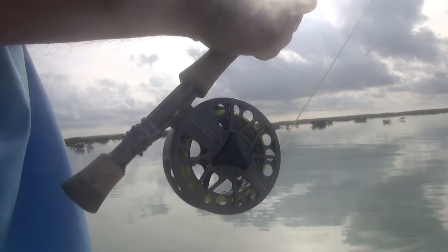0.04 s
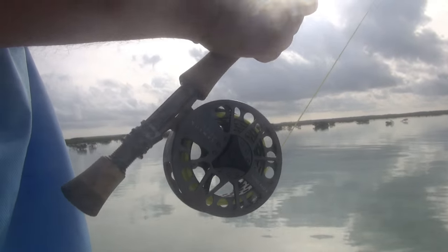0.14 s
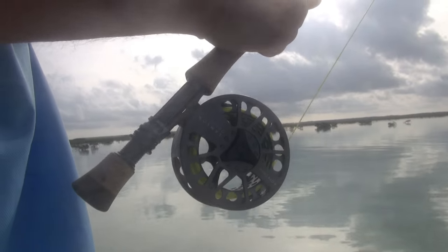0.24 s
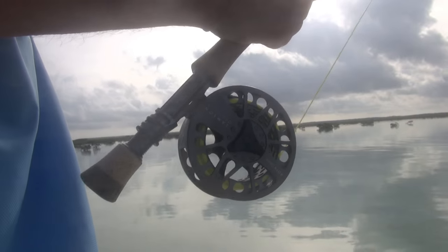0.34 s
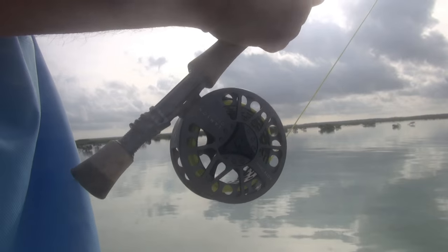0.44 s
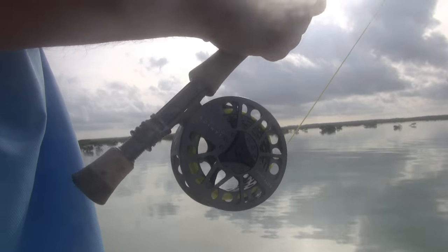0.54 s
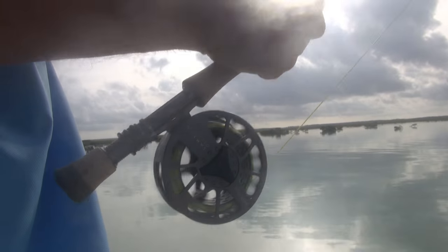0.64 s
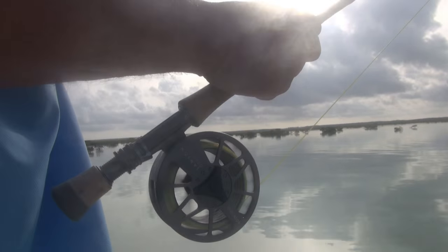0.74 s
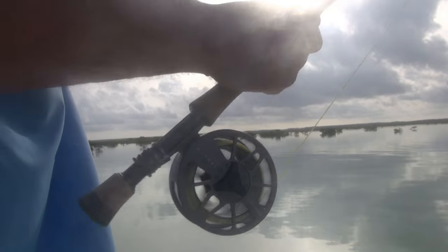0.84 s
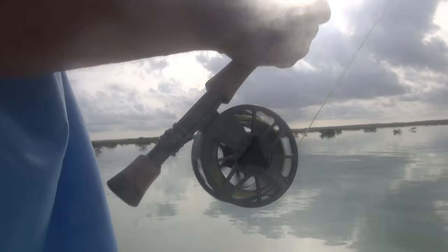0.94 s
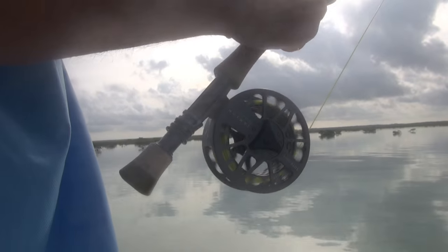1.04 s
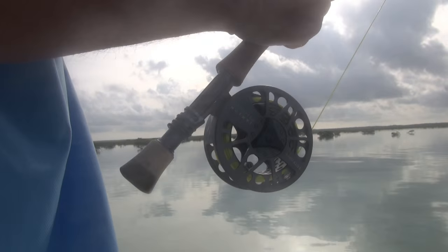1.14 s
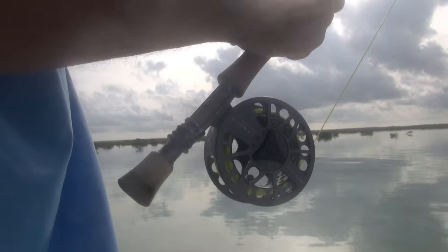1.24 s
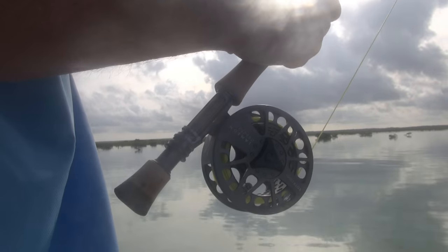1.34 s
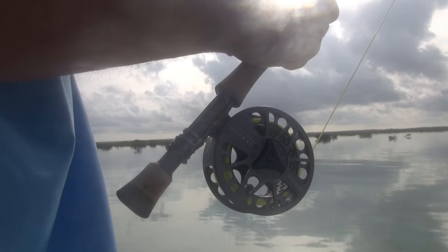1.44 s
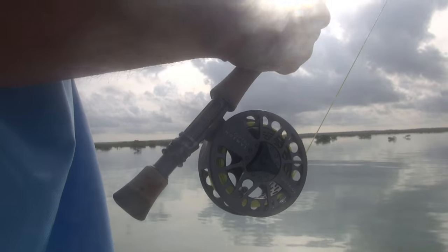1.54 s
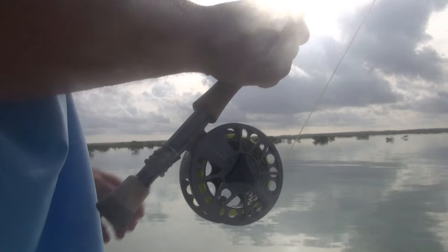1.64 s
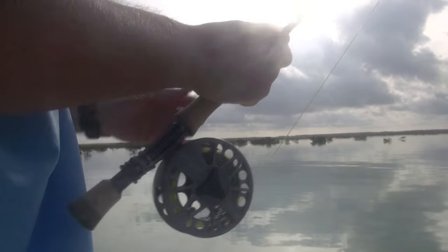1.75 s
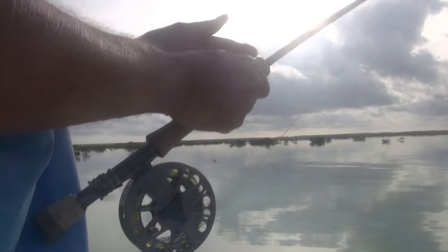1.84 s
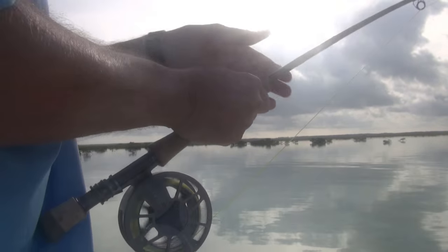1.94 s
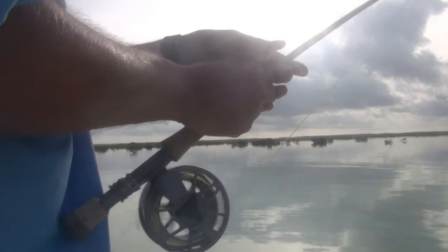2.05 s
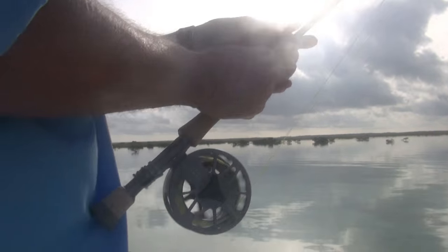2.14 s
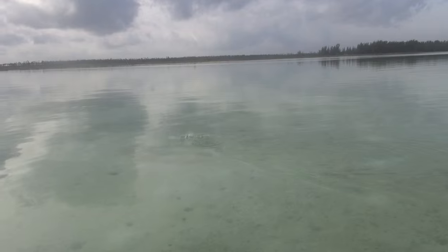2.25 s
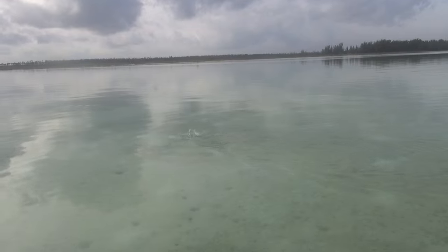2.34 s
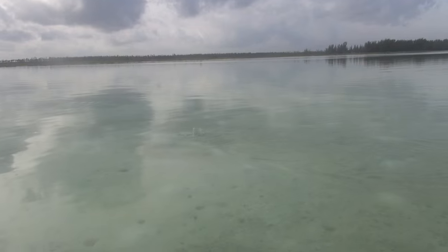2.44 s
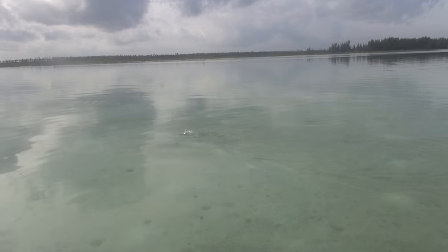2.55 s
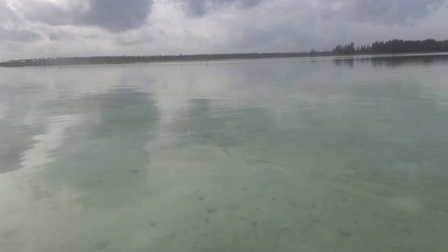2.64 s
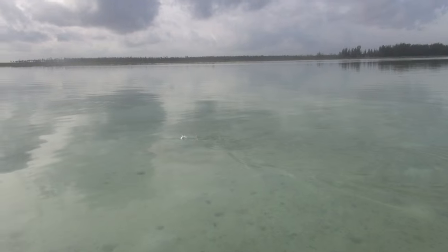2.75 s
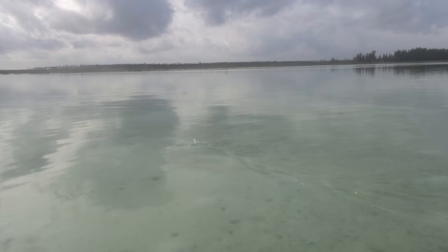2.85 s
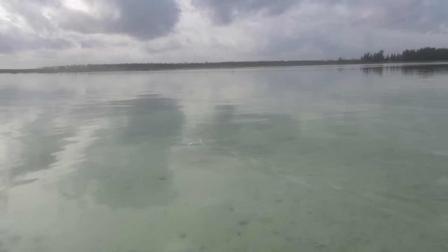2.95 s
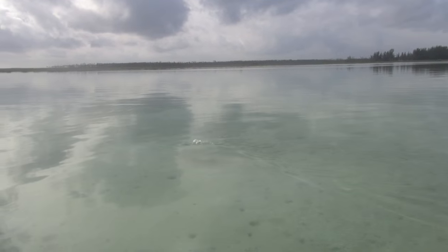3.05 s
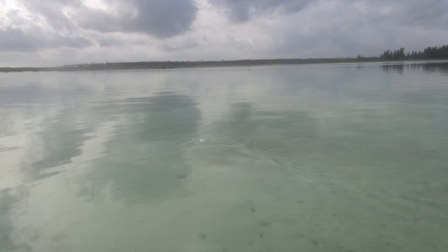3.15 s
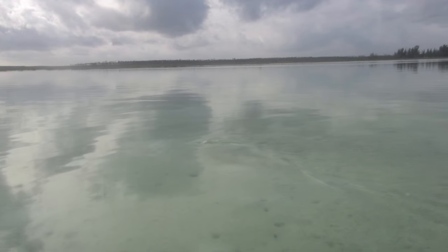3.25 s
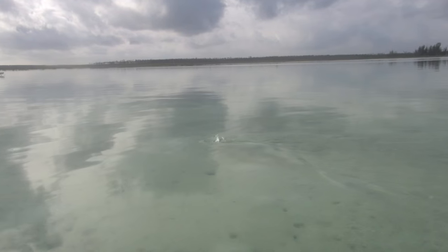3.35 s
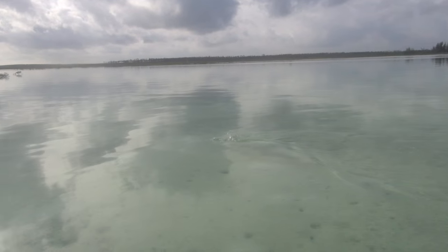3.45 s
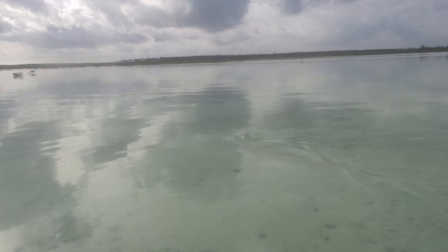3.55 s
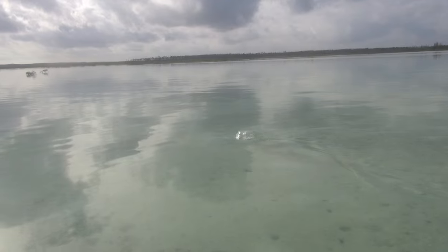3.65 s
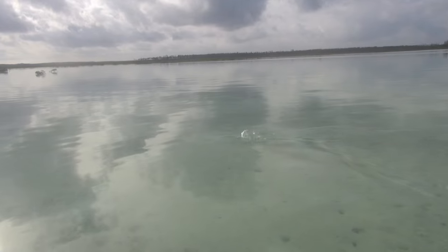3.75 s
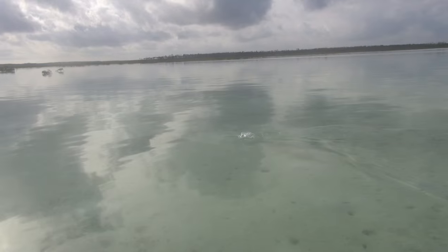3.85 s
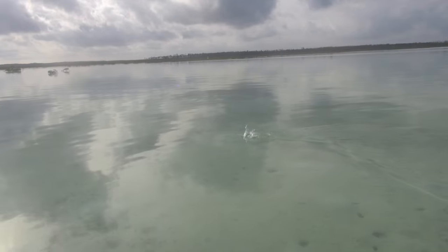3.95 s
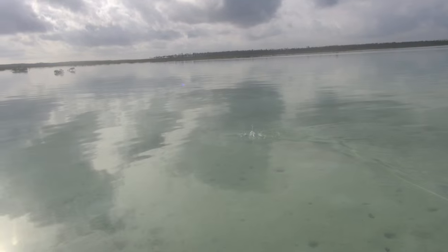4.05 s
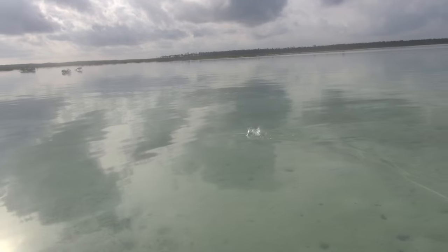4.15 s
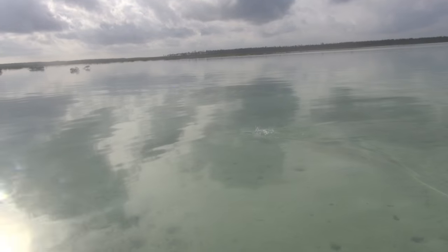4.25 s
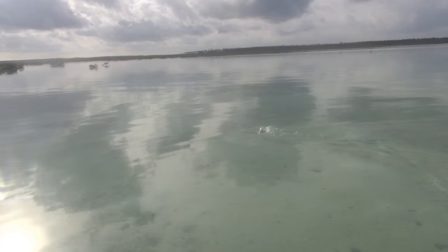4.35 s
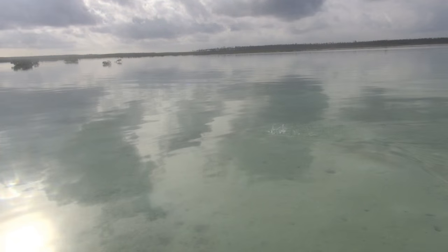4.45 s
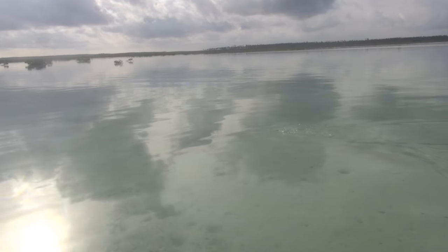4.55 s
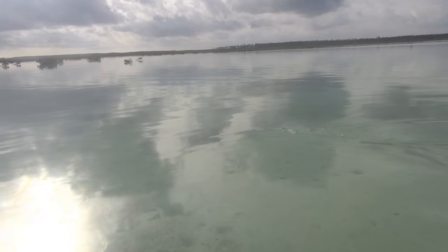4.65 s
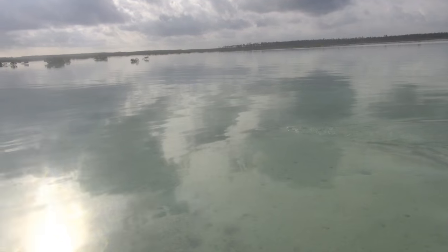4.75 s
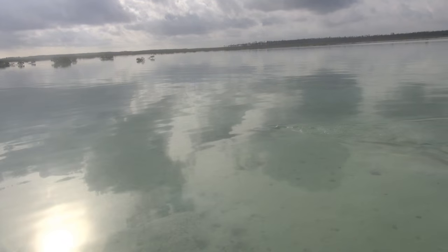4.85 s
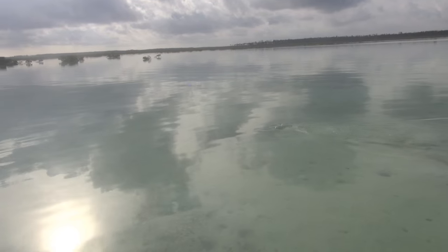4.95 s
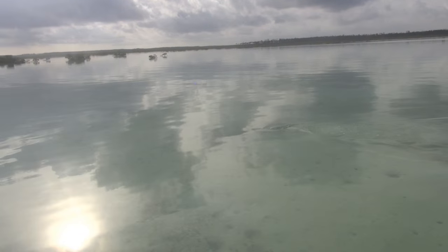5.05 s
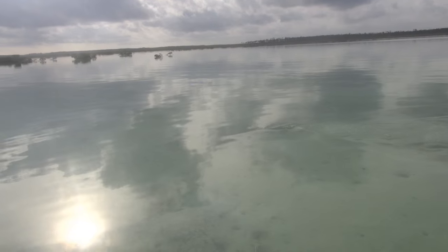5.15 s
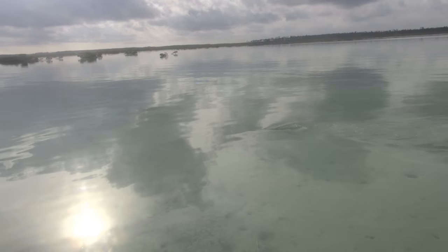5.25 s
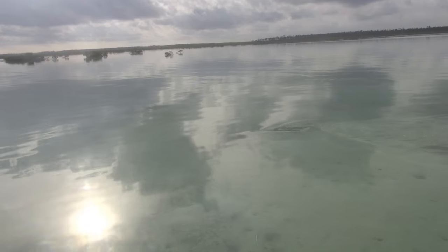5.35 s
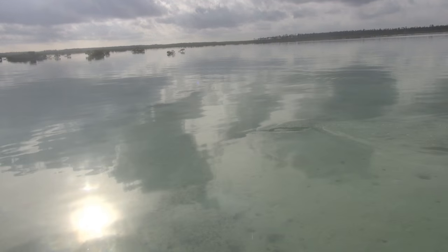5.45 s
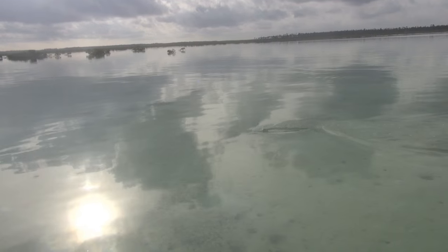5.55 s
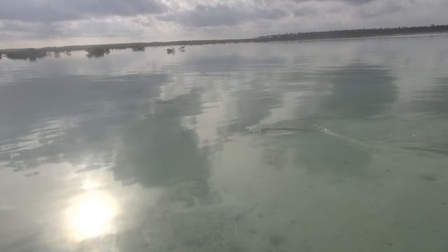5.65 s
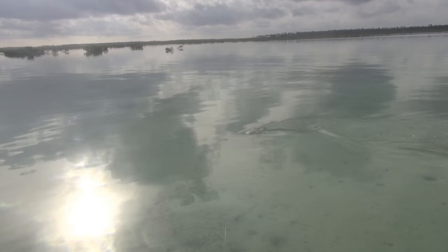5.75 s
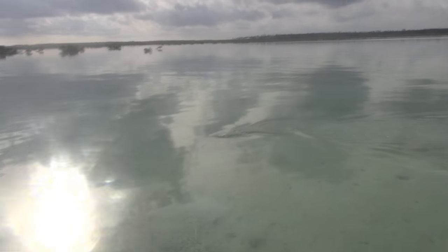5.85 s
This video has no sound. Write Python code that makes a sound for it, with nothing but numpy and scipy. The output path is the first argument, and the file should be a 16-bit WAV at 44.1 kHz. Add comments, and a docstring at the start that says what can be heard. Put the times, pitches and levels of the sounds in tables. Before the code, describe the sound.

A fishing reel buzzes in two short runs, then water splashes and gurgles close by as wind rumbles on the microphone.

```python
"""At the edge of calm, shallow water, close to a fly rod, a light wind rumbles on the microphone.
A faint bubble and a drop sound; left of centre the taut line rubs in the rod rings and a hand rustles.
A hooked fish pulls line off the reel in two short runs: the pawl buzzes over the ratchet teeth as the
spool speeds up and slows. Then water splashes, gurgles and fizzes close by, ringing with trapped
bubbles, while the wind gusts harder and the sound drifts to the centre."""
import sys
import numpy as np
from scipy import signal
from scipy.fft import rfft, irfft, next_fast_len
from scipy.io import wavfile
from scipy.ndimage import uniform_filter1d

SR = 44100
rng = np.random.default_rng(int(sys.argv[2]) if len(sys.argv) > 2 else 0)


def int16_out(signal):
    """Quantize to a 16-bit WAV file."""
    q = np.round(np.clip(np.atleast_2d(signal).T, -1, 1) * 32767)
    wavfile.write(sys.argv[1], SR, q.astype(np.int16))


N = 260487
TIME = np.arange(N) / SR
TEETH_PER_TURN = 18

# spool speed in each run, first tooth to last: time_s, teeth_per_s
FIRST_RUN = [(0.647, 62), (0.6668, 168), (0.6984, 297), (0.7443, 522), (0.8045, 608), (0.8735, 574),
             (0.9356, 479), (1.0373, 229), (1.1195, 65)]
SECOND_RUN = [(1.9308, 113), (1.9585, 239), (1.9685, 318), (2.0041, 419), (2.0393, 462), (2.1023, 401),
              (2.191, 226)]


def from_db(db):
    return 10 ** (np.asarray(db) / 20)


def rms_one(x):
    return x / np.sqrt(np.mean(x ** 2) + 1e-20)


def in_time(rows):
    """Each column after the first (time_s), at every sample."""
    s, *columns = np.transpose(rows)
    return [np.interp(TIME, s, c) for c in columns]


def add(track, start_s, sound):
    i = int(np.clip(start_s * SR, 0, N - 1))
    track[i:i + len(sound)] += sound[:N - i]


def coloured(x, spectrum):
    """Filter x by a spectrum that falls off steeply past its ends; rms 1."""
    hz, db = np.transpose(spectrum)
    size = next_fast_len(N)
    f = np.maximum(np.fft.rfftfreq(size, 1 / SR), 1)
    ends = np.minimum(f / hz[0], 1) ** 3 * np.minimum(hz[-1] / f, 1) ** 3
    gain = ends * from_db(np.interp(np.log(f), np.log(hz), db))
    return rms_one(irfft(rfft(x, size) * gain, size)[:N])


def noise(spectrum):
    return coloured(rng.standard_normal(N), spectrum)


def low_cut(x, hz):
    return signal.sosfilt(signal.butter(2, hz, "high", fs=SR, output="sos"), x)


def steadied(x, span_s):
    """Even out the level of x over spans longer than span_s."""
    return x / np.sqrt(uniform_filter1d(x ** 2, max(int(span_s * SR), 2)) + 1e-6)


def resonance(x, hz, width_hz):
    """Two-pole resonance with gain 1 at its peak."""
    r = np.exp(-np.pi * width_hz / SR)
    feedback = [1, -2 * r * np.cos(2 * np.pi * hz / SR), r * r]
    return signal.lfilter(np.array([1, 0, -1]) * (1 - r * r) / 2, feedback, x + 1e-18)


def swell(peak_s, half_s):
    return np.exp(-.5 * ((TIME - peak_s) / half_s) ** 2)


def swells(rows):
    return sum(from_db(db) * swell(s, half_s) for s, db, half_s in rows)


def wavering(step_s):
    """A new random value every step_s, joined by straight lines."""
    return np.interp(TIME / step_s, np.arange(SR), rng.standard_normal(SR))


def impulses(times, sizes):
    """Clicks placed between samples."""
    track, taps = np.zeros(N), np.arange(-8, 9)
    at = np.round(times * SR).astype(int)[:, None] + taps
    clicks = sizes[:, None] * np.sinc(at - times[:, None] * SR) * np.hanning(len(taps))
    np.add.at(track, np.clip(at, 0, N - 1), clicks)
    return track


def wind(flutter_db=-46.5, eddy_db=3.5, gust_half_s=.019, buffet_s=2.83, buffet_hz=56):
    """Eddies at the microphone port: slow rumble, quicker flutter, gusts and one strong buffet."""
    # wind strength: time_s, level_db
    breeze = [(0, -37.5), (.25, -46.5), (.42, -37.5), (.7, -43.5), (2.17, -44.5), (2.2, -30), (2.48, -31),
              (2.58, -37), (2.75, -28.5), (3.05, -33), (3.17, -44), (3.4, -43), (3.52, -37.5), (4.4, -34.5),
              (5.1, -31.5), (5.8, -31.5), (5.9, -38)]
    # thumps on the microphone: peak_s, rumble_db, flutter_db
    gusts = [(.39, -33, -45), (1.3, -38, -60), (1.5, -36, -52), (1.87, -35.5, -57), (2.211, -45, -32),
             (3.57, -47, -31.5), (3.66, -31, -56), (3.88, -33, -35.5), (3.95, -24, -43),
             (4.099, -21.5, -33), (4.468, -22.5, -36.5), (4.63, -27, -32), (4.752, -20.5, -33),
             (4.88, -26, -31.5), (5.33, -24, -35), (5.44, -40, -38), (5.689, -22.5, -39),
             (5.769, -18.5, -34.5)]
    # spectra: frequency_hz, level_db
    rumble_colour = [(20, -19.5), (35, -13.5), (55, -2), (75, 1), (105, -5.5), (150, -18.5), (220, -44)]
    flutter_colour = [(80, -11.5), (125, 4), (170, -2), (240, -11.5), (340, -21), (500, -31.5), (900, -46)]
    strength_db, = in_time(breeze)
    flutter_level = from_db(flutter_db + 1.29 * (strength_db - strength_db.mean())
                            + eddy_db * wavering(step_s=.04))
    gust_rumble = swells([(s, db, gust_half_s) for s, db, _ in gusts])
    gust_flutter = swells([(s, db, gust_half_s) for s, _, db in gusts])
    rumble = np.hypot(from_db(strength_db), gust_rumble) * steadied(noise(rumble_colour), .1)
    flutter = np.hypot(flutter_level, gust_flutter) * steadied(noise(flutter_colour), .06)
    buffet = swell(buffet_s, .045) ** 2 * np.sin(2 * np.pi * buffet_hz * (TIME - buffet_s))
    return rumble + flutter + from_db(-13.5) * buffet


def open_air(level_db=-61.5):
    """The faint, steady hush of the place."""
    # spectrum: frequency_hz, level_db
    colour = [(180, -35), (300, -3), (562, -9.5), (907, -9), (1160, -15.5), (6250, -19.5),
              (12300, -23), (15500, -22.5)]
    return from_db(level_db) * noise(colour)


def gurgles(damping=1.86, mean_octaves_per_s=10.2):
    """Large bubbles sing, gliding up ever faster as they near the surface."""
    # the loudest large bubbles: start_s, level_db, start_hz, length_s
    large_bubbles = [(0.114, -48, 844, 0.025), (2.367, -35, 534, 0.057), (2.543, -44.5, 947, 0.042),
                     (2.597, -41, 830, .05), (2.695, -30.5, 590, 0.016), (3.161, -34.5, 1410, 0.012),
                     (3.391, -35.5, 904, .015), (3.447, -36.5, 661, 0.076), (3.506, -34, 524, 0.033),
                     (3.786, -29, 645, 0.031), (3.832, -34, 870, 0.036), (4.242, -36, 1004, 0.057),
                     (4.327, -34, 516, 0.04), (4.358, -29, 460, 0.042), (4.454, -31.5, 854, 0.046),
                     (4.717, -26, 940, 0.0079), (5.077, -35, 720, 0.031), (5.156, -45, 825, 0.044),
                     (5.258, -41.5, 1080, 0.012), (5.888, -35, 847, .02)]
    out = np.zeros(N)
    for s, db, hz, length_s in large_bubbles:
        age = np.linspace(0, 1, int(length_s * SR))
        shape = signal.windows.tukey(len(age), .25) * np.exp(-damping * age)
        glide_hz = hz * 2 ** (mean_octaves_per_s * length_s * age ** 2)
        add(out, s, from_db(db) * shape * np.sin(2 * np.pi * np.cumsum(glide_hz) / SR))
    return out


def bubble(hz, ring_s, rise):
    """A trapped bubble rings down by 60 dB while its pitch climbs by the share rise."""
    age = np.arange(int(ring_s * SR) + 2) / (ring_s * SR)
    return np.sin(2 * np.pi * hz * ring_s * (age + rise * age ** 2 / 2)) * np.exp(-np.log(1000) * age)


def drops(rise=.19, ring_cycles=40, slap_s=.0028, slap_top_hz=4500, spatter_s=.026):
    """Each drop slaps the surface, traps a bubble and throws a spatter of smaller ones."""
    # the loudest drops: start_s, level_db, bubble_hz, relative_slap_db
    landings = [(.236, -52, 2880, 9.5), (2.252, -28, 944, -0.5), (2.268, -18, 4900, -8.5),
                (2.512, -29, 2860, 6.5), (2.567, -18.5, 2600, -9.5), (2.7522, -20, 1690, 6),
                (2.825, -22, 3900, -16), (2.899, -33.5, 655, -22), (2.998, -20.5, 1370, 1),
                (2.997, -13, 3900, -20), (3.183, -22.5, 2220, -8), (3.253, -25.5, 1660, 1),
                (3.299, -23, 3940, -2.5), (3.352, -22, 2710, -20), (3.44, -25, 960, -1.5),
                (3.484, -25.5, 1064, -14), (3.619, -18, 815, -4), (3.624, -19, 1326, -7.5),
                (3.889, -18, 950, -1.5), (3.927, -20.5, 1310, -11), (3.956, -24, 1700, 0),
                (4.125, -25.5, 757, -12), (4.193, -21.5, 1160, -0.5), (4.38, -20.5, 3260, -11),
                (4.427, -20, 1035, -16), (4.498, -17, 1210, -26), (4.576, -17, 3980, -11),
                (4.712, -19, 1710, 1), (4.856, -23.5, 4450, -15), (4.951, -26, 1790, -5),
                (4.996, -29.5, 1890, -19), (5.038, -32, 2430, -8), (5.878, -20, 3680, -15)]
    out, t = np.zeros(N), TIME[:SR // 40]
    soften = signal.butter(1, slap_top_hz, fs=SR, output="sos")
    for s, db, hz, slap_db in landings:
        burst = rng.standard_normal(len(t)) * np.exp(-t / slap_s)
        add(out, s, from_db(db + slap_db) * signal.sosfilt(soften, low_cut(burst, hz=750)))
        add(out, s, from_db(db - 2) * bubble(hz, ring_cycles / hz, rise))
        for late, pitch in rng.random((8, 2)):
            small_hz = 1500 * 4 ** pitch
            spatter = bubble(small_hz, 25 / small_hz, rise)
            add(out, s + spatter_s * late, from_db(db + slap_db - 9) * spatter)
    return out


def line_rubs():
    """The taut line slips in the rod rings with brief gritty rubs."""
    # slips: peak_s, level_db, half_length_s
    slips = [(0.351, -48.5, 0.0097), (0.539, -40, 0.019), (0.589, -44.5, 0.0093), (0.644, -40.5, 0.0087),
             (1.128, -42, 0.013), (1.685, -43, 0.011), (1.729, -38, 0.013), (1.869, -47, 0.023),
             (1.94, -29, 0.011)]
    # spectrum: frequency_hz, level_db
    colour = [(410, -41.5), (700, -15.5), (1250, -11), (1450, -12.5), (2550, 1), (3570, -11), (4820, -12),
              (6200, -21.5), (10500, -26.5), (14000, -38.5)]
    return noise(colour) * swells(slips)


def grip():
    """The hand rustles on the rod."""
    # rustles: peak_s, level_db, half_length_s
    rustles = [(.44, -55.5, .014), (.8, -53.5, 0.17), (1.6, -72, 0.035), (1.97, -53.5, 0.39)]
    # spectrum: frequency_hz, level_db
    colour = [(250, -3.5), (480, -0.5), (750, -3.5), (1300, -8.5), (2500, -15)]
    return noise(colour) * swells(rustles)


def teeth(run, heavy_tooth):
    """One row a tooth: time_s, teeth_per_s, turns from the tooth that presses hardest."""
    s, per_s = np.transpose(run)
    t = np.arange(s[0], s[-1], 1 / SR)
    passed = np.cumsum(np.interp(t, s, per_s)) / SR
    times = np.interp(np.linspace(0, passed[-1], round(passed[-1]) + 1), passed, t)
    turns = (np.arange(len(times)) - heavy_tooth) / TEETH_PER_TURN
    return np.column_stack([times, np.interp(times, s, per_s), turns])


def pawl_force(speed, take_up_share=.041, bright_db_per_octave=2.5):
    """The blow, in dB on frame and bright modes, builds as slack is taken up and fades with the pull."""
    # scale of the force lost early and late in each run: slack_db, spent_db
    pulls = [(4.5, 12.5), (9, 6.5)]
    course = [(run[end][0], share, *pull) for run, pull in zip((FIRST_RUN, SECOND_RUN), pulls)
              for end, share in ((0, 0), (-1, .93))]
    progress, slack_db, spent_db = in_time(course)
    slack = slack_db * np.exp(-progress / take_up_share)
    spent = spent_db * progress ** 3
    frame_db = -.9 - slack - spent
    bright_db = 3.5 + bright_db_per_octave * np.log2(speed / 400) - slack - .37 * spent
    return frame_db, bright_db


def reel_body(contacts, tooth_times, speed, turns, bright_above_hz=6000, wander_db=1.8):
    """The pawl's contacts ring the reel's low frame modes and high bright modes."""
    # reel resonances: pitch_hz, width_hz, level_db
    modes = [(1661, 180, -8), (2295, 130, -1), (2420, 210, -0.5), (2921, 55, 5), (3353, 87, 0),
             (3640, 160, -4), (3802, 100, 3.5), (3945, 480, 1.5), (4360, 90, 4), (4790, 95, -2.5),
             (5720, 290, -11), (6890, 670, -15), (7400, 300, -14.5), (7930, 180, -6), (9680, 1200, -11),
             (10140, 900, -2.5), (10460, 480, -0.5), (10880, 560, 4.5), (11050, 570, 1.5),
             (11500, 310, -7.5), (12200, 400, -9), (13000, 96, -5), (14200, 320, -13.5), (15270, 530, -7.5),
             (15440, 400, -9.5)]
    frame_db, bright_db = pawl_force(speed)
    # the buzz thins at both extremes: slow teeth only tick, fast ones have weak low harmonics
    edge_hz = np.maximum(2040 - 2.7 * speed, 3.44 * speed)
    out = np.zeros(N)
    for k, (hz, width, db) in enumerate(modes):
        # each mode swells once a turn, at its own angle of the spool
        wobble = np.cos(2 * np.pi * (turns + (hz - 10800) / 7000))
        if hz > bright_above_hz:
            force = from_db(bright_db + 3.5 * wobble)
        else:
            force = from_db(frame_db + 1.5 * wobble) / (1 + (edge_hz / hz) ** 10)
        # the point of contact wanders, so each mode comes and goes over a few teeth
        wander = rms_one(uniform_filter1d(rng.standard_normal(len(tooth_times)), size=7))
        force *= from_db(wander_db * np.interp(TIME, tooth_times, wander))
        out += (-1) ** k * from_db(db) * resonance(contacts * force, hz, width)
    return out


def whine(speed, turns):
    """The pawl rides the tooth ramps: clean partials that swell with speed."""
    # partials at 500 teeth per s: tooth_rate_multiple, level_db
    harmonics = [(4, -38), (5, -43), (6, -52.5), (7, -34), (8, -41.5), (9, -33)]
    running = sum((TIME > run[0][0]) & (TIME < run[-1][0]) for run in (FIRST_RUN, SECOND_RUN))
    partials = sum(from_db(db) * np.sin(2 * np.pi * k * TEETH_PER_TURN * turns) for k, db in harmonics)
    return running * (speed / 500) ** 2 * partials


def reel(jitter_s=6e-6, uneven_db=1.7, slow_per_s=160, rebound_s=.0008, scrape_s=.0033,
         spring_delay_s=.002023, end_s=2.1935):
    """The pawl drops off each tooth, scrapes and, given time, rebounds; each contact rings the reel."""
    # single knocks of the pawl: start_s, relative_db
    lone_knocks = [(1.9043, -1.5), (1.986, -4)]
    # long rings of the spool rim: pitch_hz, width_hz
    rim_modes = [(9660, 50), (12080, 50), (14300, 55)]
    # pawl spring resonances: pitch_hz, width_hz, level_db
    spring_modes = [(3760, 100, 7.5), (4133, 70, -5)]
    runs = np.vstack([teeth(FIRST_RUN, heavy_tooth=16), teeth(SECOND_RUN, heavy_tooth=12)])
    speed, turns = in_time(runs)
    jitter, uneven, scatter = rng.standard_normal((len(runs), 3)).T
    times, per_s = runs[:, 0] + jitter_s * jitter, runs[:, 1]
    # at speed the pawl has less time to fall, so each blow is lighter and rebounds less
    sizes = np.sqrt(400 / np.maximum(per_s, slow_per_s)) * from_db(uneven_db * uneven)
    loose = sizes * np.minimum(slow_per_s / per_s, 1) ** 2
    knock_s, knock_db = np.transpose(lone_knocks)
    knocks = impulses(knock_s, from_db(knock_db))
    blows = impulses(times, sizes) + 2 * knocks
    rebounds = impulses(times + rebound_s * (1 + .18 * scatter), loose)
    fade = np.exp(-2 / (scrape_s * SR))
    scrape_power = signal.lfilter([1 - fade], [1, -fade], blows ** 2 + 1e-18)
    scraping = np.sqrt(scrape_power) * rng.standard_normal(N)
    rattle = from_db(-24) * low_cut(scraping, hz=2200)
    body = reel_body(blows + rebounds + .45 * scraping, runs[:, 0], speed, turns)
    rim = from_db(-6) * sum(resonance(blows, hz, width) for hz, width in rim_modes)
    # the spring rings between the slow teeth of the first run, and at the knocks
    twang = impulses(times + spring_delay_s, loose * (times < knock_s[0])) + knocks
    spring = sum(from_db(db) * resonance(twang, hz, width) for hz, width, db in spring_modes)
    buzz = low_cut(rattle + body + rim + spring, hz=730)  # the small spool radiates little bass
    break_off = np.clip((end_s - TIME) / .001, 0, 1)
    return (from_db(12) * buzz + whine(speed, turns)) * break_off


def bubble_crowd(low_hz, high_hz, cycles, rise, spread_db, count):
    """Bubbles of random moment, pitch and size, each ringing for about so many cycles."""
    crowd = np.zeros(N)
    for when, pitch, size, life in rng.random((count, 4)):
        hz = low_hz * (high_hz / low_hz) ** pitch
        level = from_db(-spread_db * np.log(size + .018))
        add(crowd, when * N / SR, level * bubble(hz, cycles * (.5 + life) / hz, rise))
    return crowd


def stirred_water(spray_db=-54, spray_follows=.61, spurt_db=2.5):
    """Spurts of small bubbles and rising chirps on a soft wash, with ticking, hissing spray on top."""
    # how hard the water is stirred: time_s, level_db
    stirring = [(2.22, -49.5), (2.37, -50), (3.12, -52.5), (3.51, -40), (4.23, -40.5), (4.33, -38),
                (4.42, -40), (4.79, -55.5), (5.55, -69.5), (5.9, -47)]
    # spectra: frequency_hz, level_db
    water_colour = [(180, -41.5), (300, -35), (377, -4.5), (467, -16), (714, -11.5), (1230, 2), (2440, 3),
                    (4390, -0.5), (5800, -5.5), (15000, -13.5)]
    spray_colour = [(2800, -3), (4800, -1.5), (9000, -0.5), (12000, -2), (15500, -10)]
    bubbles = bubble_crowd(520, 6000, cycles=24, rise=.25, spread_db=4.8, count=2600)
    bubbles = steadied(coloured(bubbles, water_colour), .1)
    chirps = steadied(bubble_crowd(480, 1900, cycles=70, rise=.7, spread_db=4, count=420), .2)
    ticks = bubble_crowd(3000, 14500, cycles=15, rise=.1, spread_db=6.2, count=2800)
    spray = coloured(ticks, spray_colour) + from_db(-9) * noise(spray_colour)
    churn = from_db(-.5) * bubbles + from_db(-5) * chirps + from_db(-7) * noise(water_colour)
    stirring_db, = in_time(stirring)
    spray_level = from_db(spray_db + spray_follows * (stirring_db - stirring_db.mean()))
    spurts = from_db(spurt_db * wavering(step_s=.035)) * (TIME > stirring[0][0])
    return (from_db(stirring_db) * churn + spray_level * spray) * spurts


def fizz(rise_db_per_s=136.5, fade_db_per_s=27):
    """The line cuts the surface: fine fizz that rises quickly and dies away slowly."""
    # spells of fizz: peak_s, level_db
    spells = [(2.471, -47.5), (5.72, -54)]
    # spectrum: frequency_hz, level_db
    colour = [(3000, -9.5), (5000, -12.5), (6500, -2), (8500, -4.5), (10500, -11.5), (15500, -18)]
    level = sum(from_db(db - np.maximum(rise_db_per_s * (s - TIME), fade_db_per_s * (TIME - s)))
                for s, db in spells)
    return level * noise(colour)


def scene():
    """All sources reach one microphone, whose balance drifts from the left to the centre."""
    # stereo balance: time_s, left_minus_right_db
    balance = [(0, 7.5), (.7, 6), (2.1, 6), (2.4, 4), (3.3, 4), (5.9, 0.25)]
    water = drops() + gurgles() + stirred_water() + fizz()
    tackle = reel() + line_rubs() + grip()
    mono = tackle + water + wind() + open_air()
    lean = from_db(in_time(balance)[0])
    return mono * np.array([2 * lean, 2 * np.ones(N)]) / (1 + lean)


def record(dry):
    """The recorder clips at full scale and cuts the top above 15750 Hz."""
    low_pass = signal.ellip(12, .1, 80, 15750, fs=SR, output="sos")
    return signal.sosfilt(low_pass, np.clip(dry, -1, 1))


dry = scene()
out = record(dry)
int16_out(out)
```